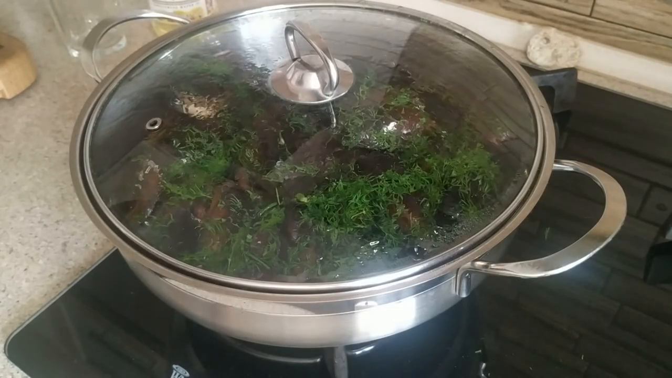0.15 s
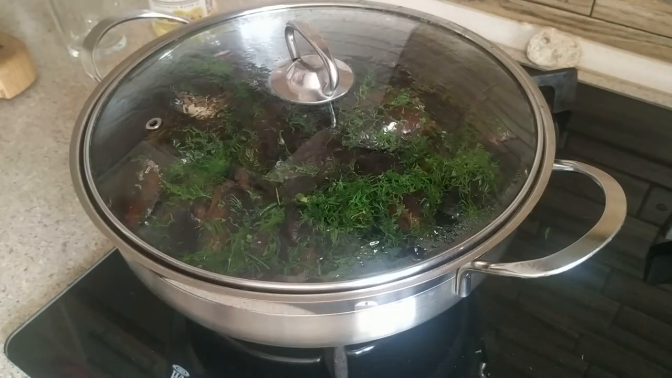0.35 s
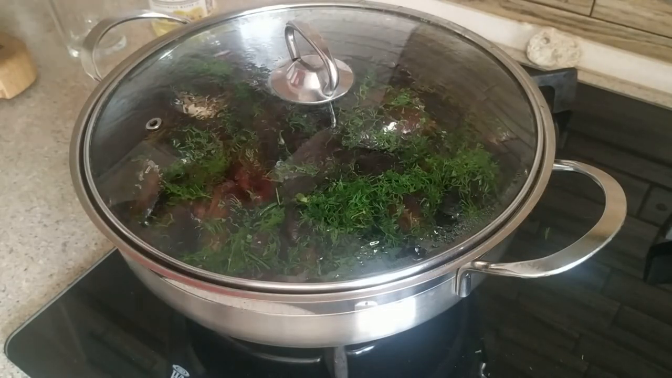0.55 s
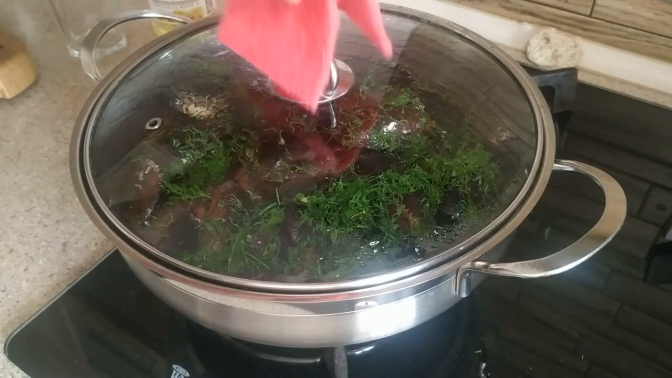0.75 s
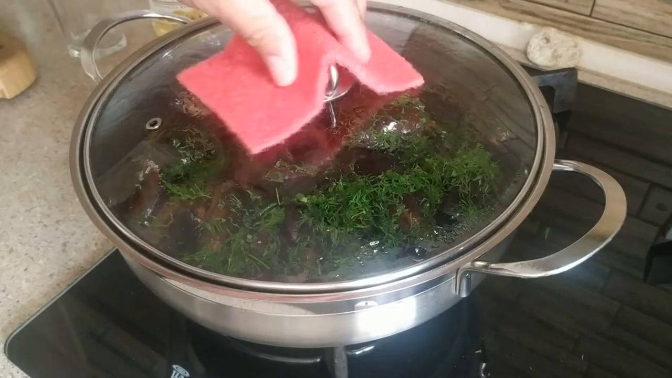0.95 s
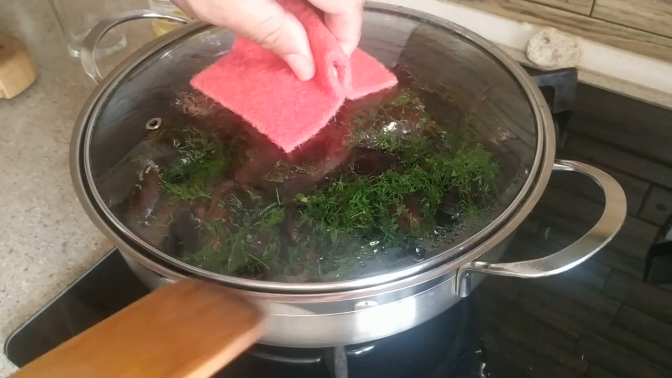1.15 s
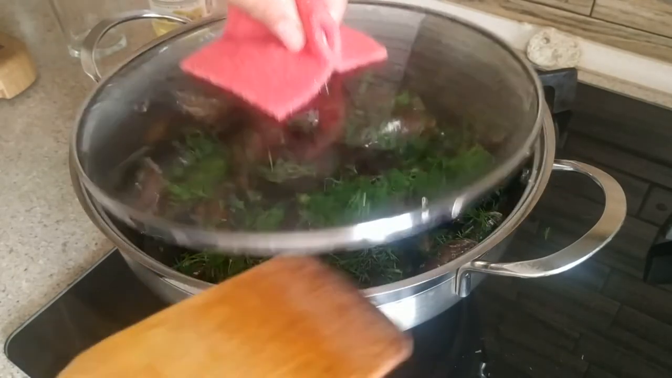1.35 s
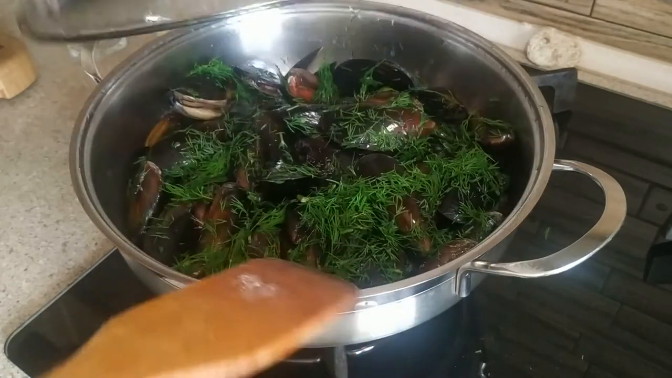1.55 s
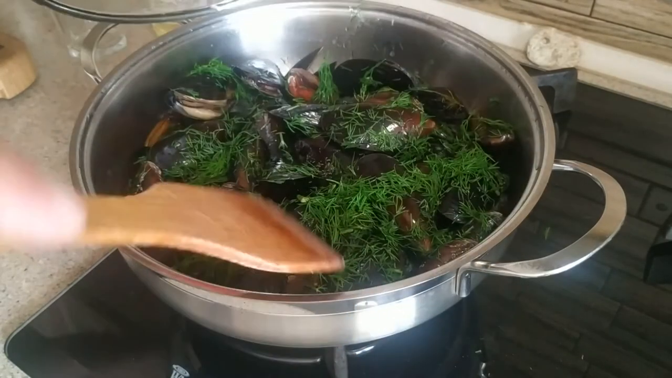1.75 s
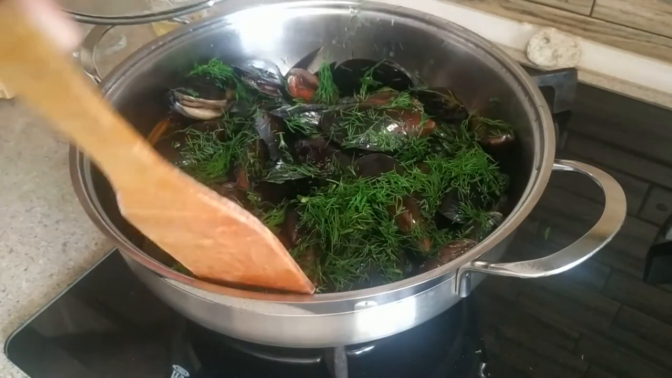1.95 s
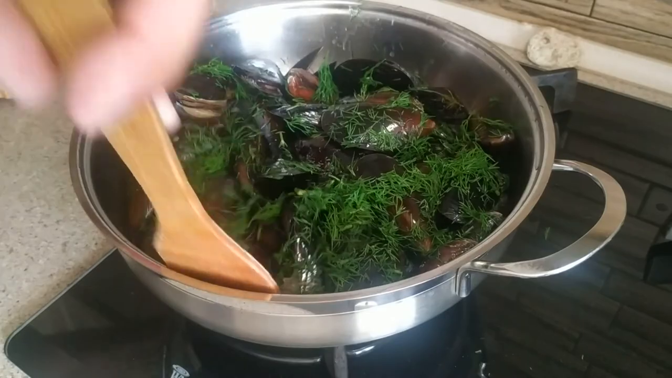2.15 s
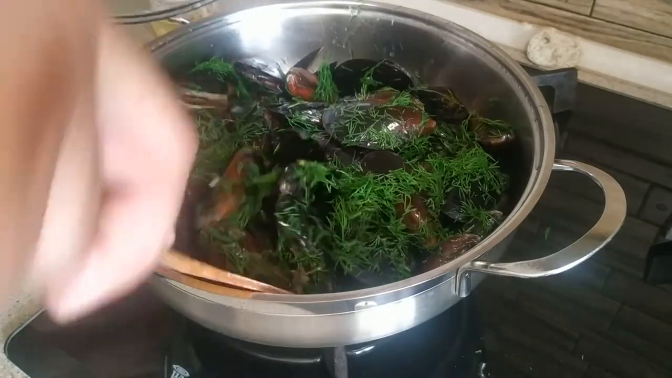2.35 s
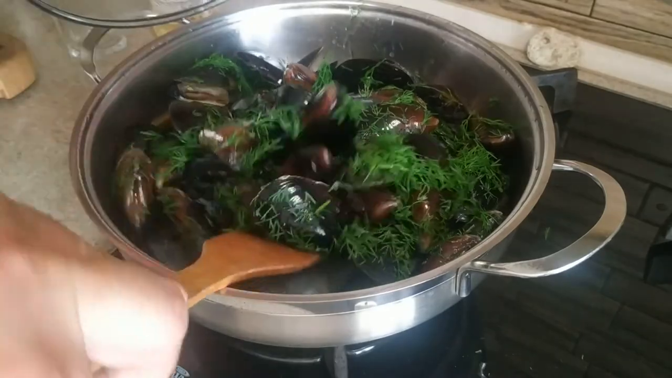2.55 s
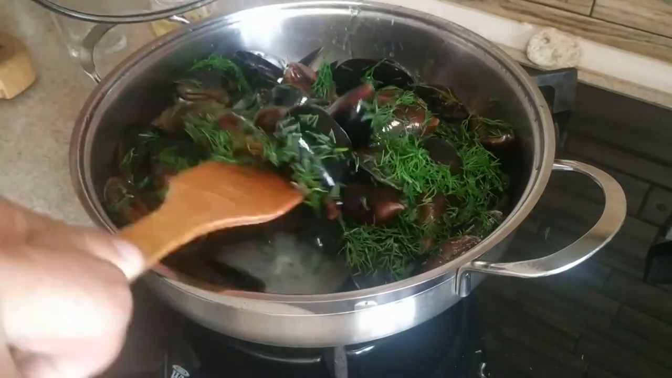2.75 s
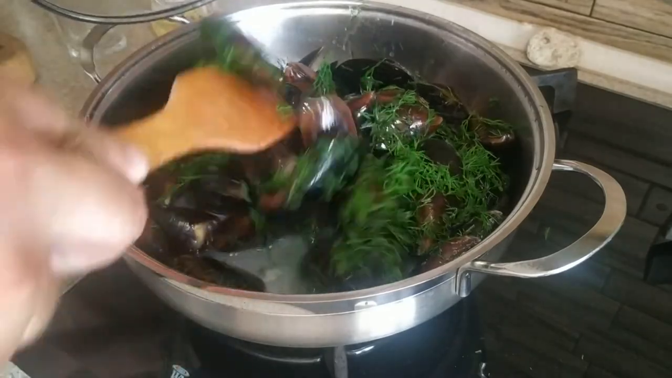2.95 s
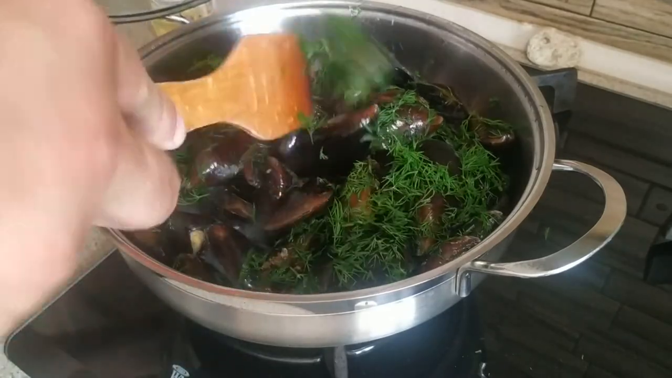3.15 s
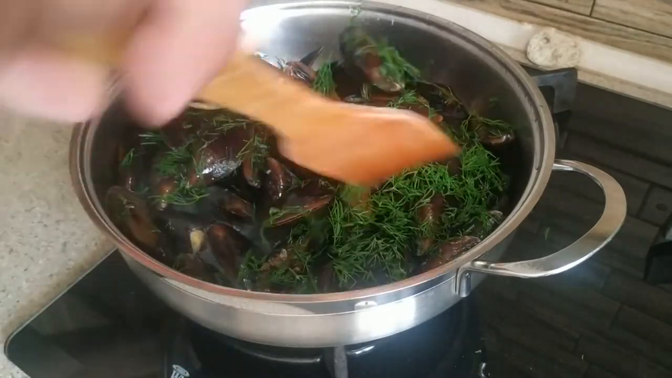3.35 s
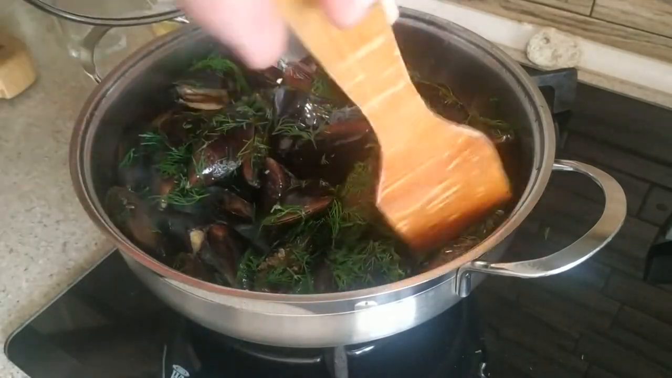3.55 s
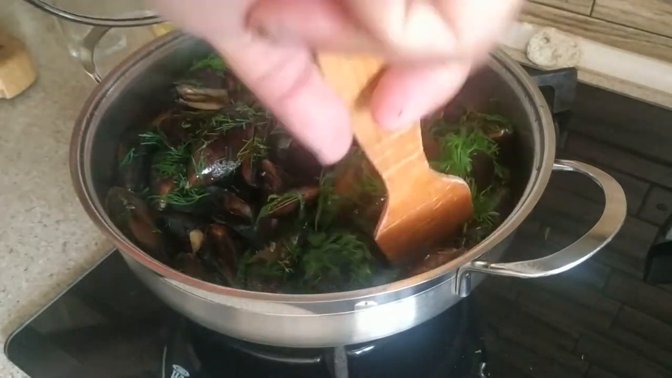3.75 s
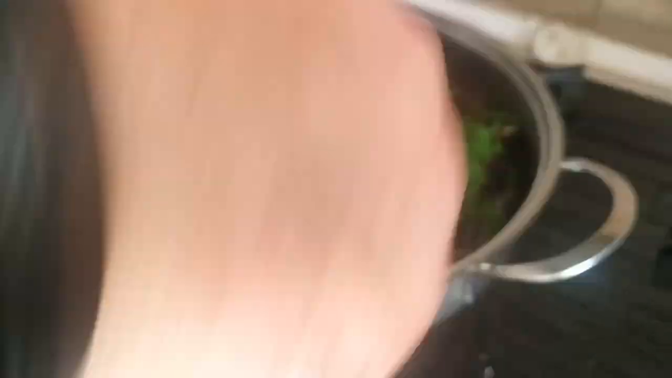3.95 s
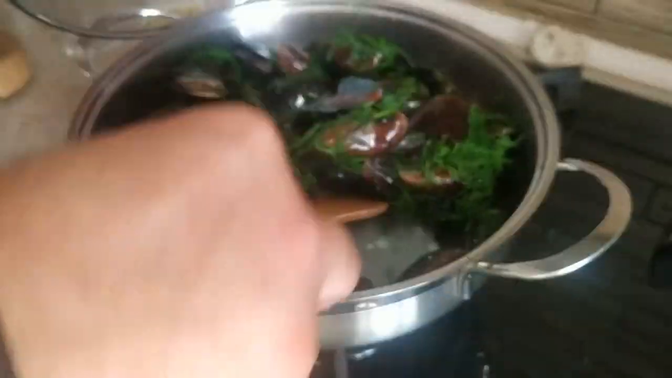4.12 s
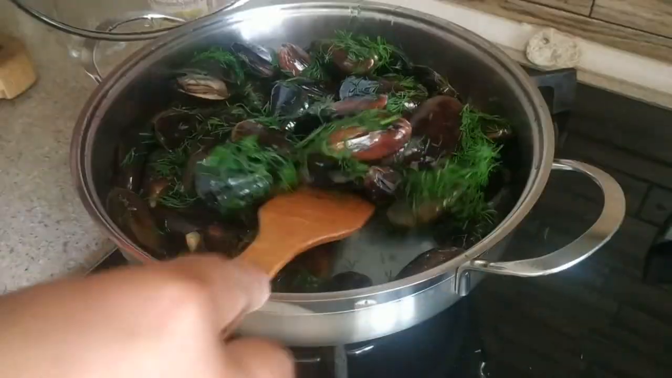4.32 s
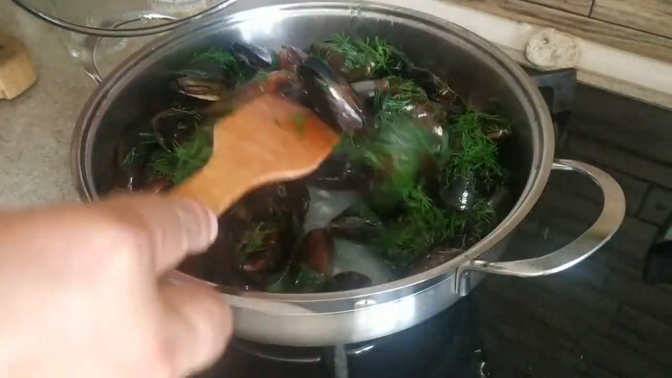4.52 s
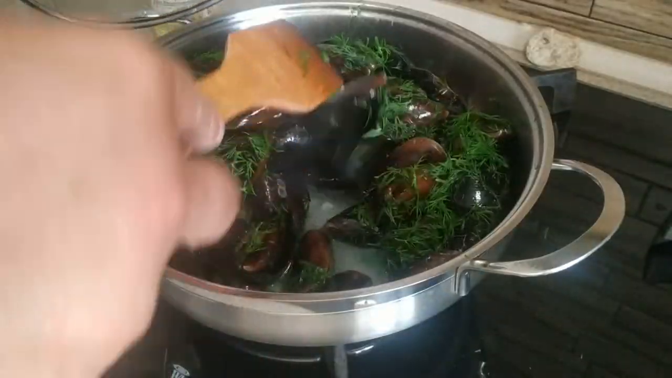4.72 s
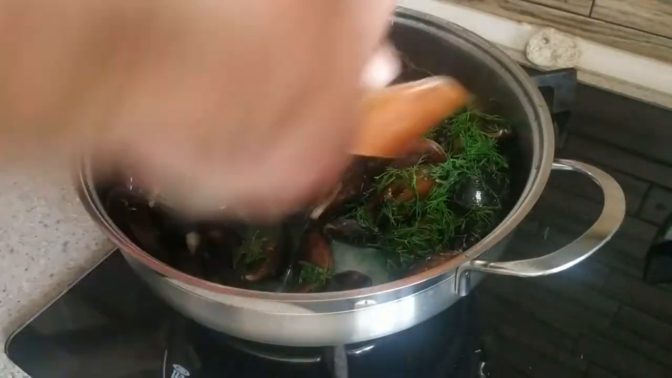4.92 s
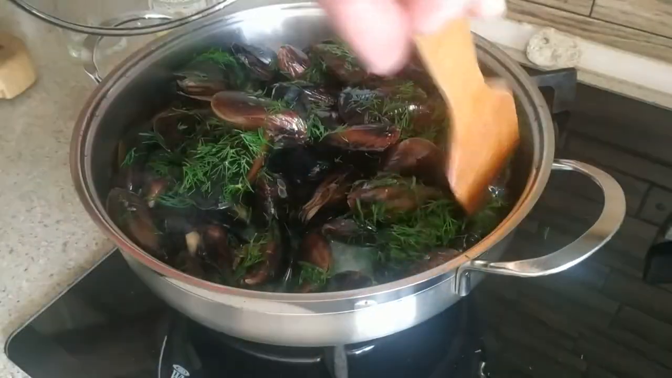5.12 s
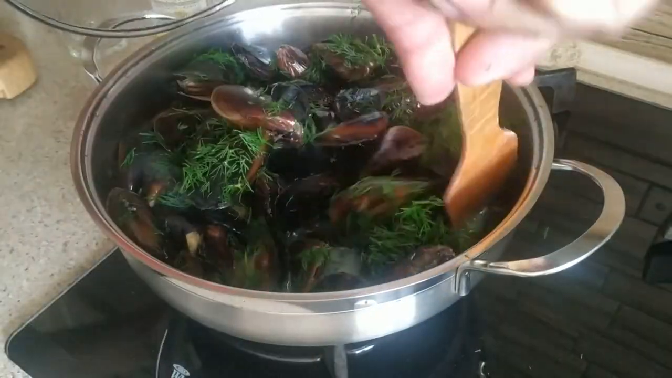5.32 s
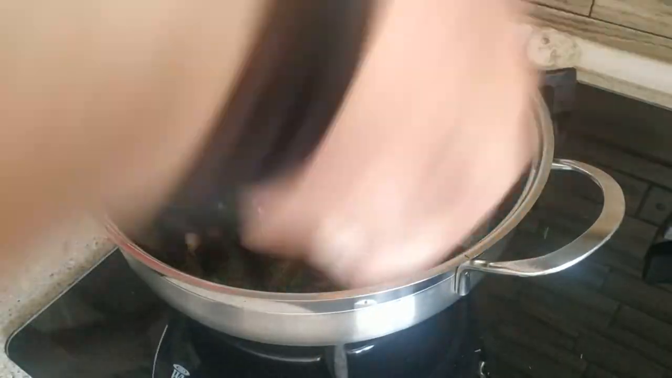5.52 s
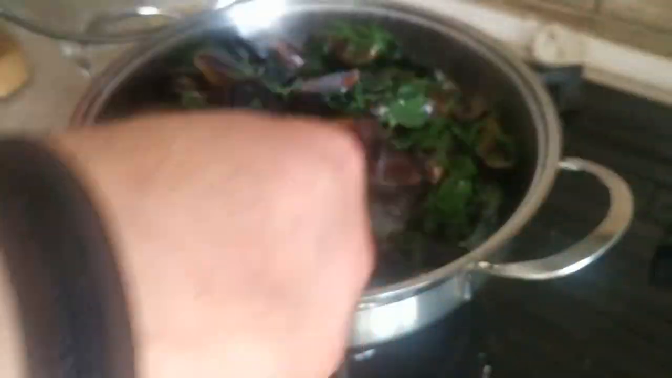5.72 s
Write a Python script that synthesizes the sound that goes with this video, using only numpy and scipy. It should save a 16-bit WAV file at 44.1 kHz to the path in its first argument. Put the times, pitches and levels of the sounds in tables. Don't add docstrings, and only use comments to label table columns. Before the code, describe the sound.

Quiet kitchen hum, then soft cloth rubbing and faint glassy ringing as a hand grips a pan lid. It lifts with a muffled clunk, a low boom and a breathy puff of steam. A wooden spatula then stirs mussels in strokes: hollow knocks, sharp shell clacks and gritty scrapes on steel, with juice hissing. Close stereo microphone, small tiled room with short reflections.

```python
import sys
import numpy as np
from scipy import signal
from scipy.io import wavfile
from scipy.ndimage import uniform_filter1d

SR = 44100
rng = np.random.default_rng(int(sys.argv[2]) if len(sys.argv) > 2 else 0)


def generate_wav(sig):
    pcm = np.round(np.clip(np.atleast_2d(sig).T, -1, 1) * 32767).astype(np.int16)
    wavfile.write(sys.argv[1], SR, pcm)


def decibels_to_gain(level_db):
    exponent = np.asarray(level_db, float) / 20
    return 10 ** exponent


N = 259308

# (frequency [Hz], density [dB per Hz])
KITCHEN_SPECTRUM = [(20, 1.5), (34, -28), (49, -6.5), (158, -12.5), (347, -14), (1090, -21), (1570, -25.5),
                    (16000, -26)]
STEAM_SPECTRUM = [(880, -45), (1500, -3), (1690, -0.5), (1920, -4.5), (3220, 0.5), (4830, 0.5),
                  (16000, -2.5)]
PUFF_SPECTRUM = [(150, -40), (260, -6), (425, -10), (529, -6), (1140, -10.5), (2500, -16), (3250, -31),
                 (5500, -120)]
LID_RUMBLE_SPECTRUM = [(24, -36), (40, -2), (59, -6), (108, 6), (220, -1), (300, -6), (390, -30),
                       (660, -120)]
RATTLE_SPECTRUM = [(150, -20), (250, -22), (450, -5.5), (1000, -2.5), (1800, -3), (2600, -6), (4000, -48),
                   (8000, -68)]
SCRAPE_SPECTRUM = [(1200, -17.5), (2200, -0.5), (3000, 1), (5000, 0), (6500, -5.5), (10000, -9.5)]
HISS_SPECTRUM = [(2500, -12), (5000, -0.5), (6500, -1.5), (9000, 3.5), (13000, 2.5), (15700, -0.5)]
THUD_SPECTRUM = [(20, -23), (45, -17), (68, 3), (84, 3), (96, -27), (160, -21), (260, -13), (400, -24)]
# (frequency [Hz], width [Hz], height [dB])
HUM_HUMPS = [(151, 7.1, 2.5), (1370, 230, 3.5), (4990, 240, 2.5), (10300, 1000, 0.5), (11160, 760, 2)]
GLASS_HUMPS = [(1540, 40, 16), (1850, 50, 25), (2500, 50, 13), (3630, 70, 11), (4780, 80, 13),
               (5200, 140, 9), (5850, 200, 14)]
PAN_HUMPS = [(478.3, 23, 4.5), (625, 37, 6), (1090, 68, 6.5), (1400, 190, 1.5), (1700, 710, -1.5),
             (2420, 90, -86), (3680, 450, 7)]
# (frequency [Hz], correlation [-1..1])
PORT_LIKENESS = [(60, 0.95), (130, 0.96), (290, 0.64), (640, 0.6), (1410, 0.045), (3100, 0), (6820, 0),
                 (15000, 0.083)]
# (frequency [Hz], level [dB], t60 [s])
BOTTOM_MODES = [(232.6, -16.5, 0.091), (387, -24.5, 0.08), (613, -10, 0.032), (1090, -25, 0.22)]
WALL_MODES = [(1700, -11.5, 0.025), (2428, -17.5, 0.039), (3880, -28.5, 0.098)]
# (time [s], rise [s], force [dB], cloth swish [dB], glass ring [dB])
LID_TOUCHES = [
    (0.423, 0.019, -66.5, -59.5, -74),
    (.776, 0.15, -68, -66, -65),
    (.928, .05, -67, -64, -55),
    (1.085, 0.018, -70, -60, -53),
    (1.13, 0.062, -67, -57, -47),
    (1.287, 0.032, -44, -42, -46),
]
# (time [s], peak [dB], shell mode
# [Hz], crack re peak [dB])
DULL_KNOCKS = [(0.424, -41, 452, -5.5), (1.285, -36.5, 540, -4), (1.763, -46, 640, 2),
               (1.919, -37, 466, -26), (1.991, -33, 560, -12), (2.123, -28.5, 1130, -23),
               (2.173, -29, 1350, -21), (2.58, -29.5, 1500, -19), (3.151, -18.5, 1110, -18),
               (3.427, -41, 2610, -15), (3.56, -25.5, 1240, -18.5), (3.667, -28, 504, -14),
               (3.797, -16.5, 1020, -39), (4.776, -22.5, 650, -16), (5.174, -30.5, 624, -20),
               (5.282, -39, 1100, -21), (5.32, -27, 1140, -27), (5.333, -16, 1070, -30),
               (5.341, -11.5, 1130, -28), (5.366, -18, 1020, -19), (5.833, -30.5, 1020, -5)]
# (time [s], peak [dB], shell mode [Hz],
# crack re peak [dB])
TUMBLE_KNOCKS = [(1.299, -50, 530, -3), (2.187, -20.5, 604, -22), (2.426, -28, 1070, -22),
                 (2.4376, -27, 970, -28), (2.794, -21.5, 1200, -18), (2.967, -33, 1070, -9),
                 (2.986, -17, 1090, -25), (3.234, -14.5, 580, -17), (3.692, -21.5, 1100, -12),
                 (3.7104, -18, 1400, -10), (3.992, -27.5, 1790, -20), (4.05, -21, 2010, -34),
                 (4.128, -25.5, 2250, -4), (4.147, -15.5, 1110, -26), (4.193, -15.5, 1250, -37),
                 (4.205, -21.5, 745, -4.5), (4.313, -30, 2100, -28), (4.442, -22, 1000, -22),
                 (4.596, -8.5, 1750, -18), (4.64, -21, 720, -31), (5.22, -15, 1170, -26),
                 (5.459, -14.5, 1010, -6.5), (5.49, -25, 1750, -16), (5.536, -27, 1420, 7.5),
                 (5.555, -16.5, 1780, -17), (5.597, -40, 1700, -13), (5.643, -20, 1460, -13.5)]
# (time [s], peak [dB], shell mode [Hz], crack re peak [dB])
RIM_CLACKS = [(2.2022, -28.5, 1190, -1), (2.32, -35, 1530, -15), (2.858, -29, 1780, -4.5),
              (2.896, -24.5, 1660, -8.5), (2.926, -30, 1240, -29), (3.0455, -23, 1780, -19),
              (3.058, -14, 1870, -18), (3.078, -24, 1399, -7.5), (3.125, -24.5, 1770, -23),
              (3.277, -18, 2150, -26), (3.7188, -16, 1460, -2), (3.737, -18.5, 2890, -22),
              (4.018, -13.5, 1720, -12), (4.078, -20, 2660, -29), (4.33, -56, 468, -3),
              (4.368, -27, 1770, -25), (4.414, -30.5, 1660, -14.5), (4.485, -52, 1500, -3),
              (4.508, -18, 2100, 4), (4.832, -30, 1830, -10), (4.8446, -13.5, 2500, -4),
              (5.109, -31, 1840, -13), (5.25, -25, 1700, -29), (5.403, -23, 1050, -31),
              (5.44, -14.5, 3160, -7), (5.51, -19.5, 2410, -12), (5.6777, -16, 3070, -32),
              (5.727, -19, 1600, -7.5)]
# (time [s], level [dB], t60
# [s])
STEEL_SPURTS = [(.69, -54, 0.51), (1.261, -35, .12), (4.528, -25, .15), (5.439, -17.5, .1),
                (4.126, -29.5, 0.31), (4.331, -27, 0.031), (4.487, -29, 0.034), (5.534, -21.5, 0.16)]
# (time [s], hiss [dB])
BARED_STEEL = [(1.8, -72), (1.91, -69), (2.14, -52.5), (2.48, -39.5), (2.74, -35.5), (2.97, -49),
               (3.02, -41.5), (3.36, -44), (3.62, -49), (3.73, -47), (3.87, -48), (4.08, -49),
               (4.17, -35.5), (4.33, -38), (4.54, -38), (4.85, -39), (5.0, -42.5), (5.88, -46.5)]
# (time [s], frequency [Hz], peak [dB], t60 [s])
FREE_RINGS = [
    (.925, 665, -52, 0.29),
    (1.311, 535, -51, 0.65),
    (1.31, 480, -54, .9),
    (3.43, 2710, -42.5, 0.2),
    (4.846, 2430, -26, 0.15),
    (4.602, 2430, -29, .14),
]
# (time [s], peak [dB], frequency [Hz], t60 [s])
BOTTOM_BOOMS = [(1.276, -33, 142, 0.11), (1.917, -48.5, 314, 0.14), (2.14, -48.5, 172, 0.15),
                (2.182, -41, 434, 0.18), (2.281, -44, 152, 0.17), (2.547, -43, 232, 0.16),
                (2.67, -54, 388, 0.15), (2.986, -41, 427, 0.15), (3.04, -44, 358, 0.14),
                (3.151, -25.5, 381, 0.064), (3.432, -49, 221, 0.23), (3.555, -40, 228, 0.11),
                (3.682, -30.5, 215, 0.076), (3.799, -34.5, 157, 0.12), (4.007, -41.5, 145, 0.15),
                (4.067, -41, 219, 0.14), (4.439, -44, 236, 0.094), (4.528, -43, 221, 0.12),
                (4.547, -39, 230, 0.18), (5.055, -50, 392, 0.15), (5.194, -34, 230, 0.078),
                (5.338, -28.5, 393, 0.074), (5.46, -45, 368, 0.15), (5.636, -47, 360, 0.15)]
# (time [s], peak [dB], frequency [Hz], t60 [s])
SHELL_CLONKS = [(2.128, -23, 1130, 0.027), (2.14, -35, 1140, 0.03), (2.153, -33, 1470, 0.028),
                (2.196, -20, 1550, 0.036), (2.215, -23, 1145, 0.033), (2.235, -29, 1420, 0.03),
                (2.292, -38, 1500, 0.03), (2.348, -45, 999, 0.03), (2.53, -24, 1360, 0.041),
                (2.546, -23.5, 1090, 0.032), (2.59, -29, 1450, 0.03), (2.609, -32, 525, 0.042),
                (2.774, -24, 1165, 0.048), (2.823, -24, 1850, 0.03), (2.871, -25, 1540, 0.03),
                (3, -20, 1080, 0.034), (3.109, -26, 1740, 0.03), (3.165, -24, 1820, 0.03),
                (3.221, -25, 670, 0.051), (3.247, -20, 1060, 0.021), (3.575, -29, 1090, 0.032),
                (3.758, -31, 1140, 0.024), (3.776, -24, 1130, 0.024), (3.817, -23.5, 1000, 0.041),
                (4.01, -17, 1770, 0.032), (4.051, -17, 1800, 0.033), (4.135, -19.5, 1150, 0.043),
                (4.164, -20, 2130, 0.03), (4.489, -20, 2220, 0.02), (4.533, -35, 650, 0.026),
                (4.547, -24, 635, 0.048), (4.561, -21.5, 720, 0.034), (4.609, -21, 2470, 0.03),
                (4.674, -27.5, 2410, 0.036), (4.785, -26, 1090, 0.03), (4.874, -18, 2340, 0.033),
                (5.22, -19, 1170, 0.027), (5.304, -35, 1160, 0.023), (5.479, -22, 1035, 0.033),
                (5.524, -21, 733, 0.043), (5.574, -26, 1020, 0.03), (5.614, -40, 557, 0.03),
                (5.865, -29, 1120, 0.03)]
EDGE_TICKS = [(2.2024, -16, 3530, 0.021), (2.2574, -26, 3300, 0.016), (2.3994, -33, 2930, 0.015),
              (2.5474, -26, 4400, 0.015), (2.6605, -19.5, 7700, 0.015), (2.745, -23, 4530, 0.015),
              (2.8044, -22, 7060, 0.018), (3.08, -14, 2890, 0.02), (3.235, -16, 4500, 0.014),
              (3.744, -30, 2530, 0.015), (3.8187, -22.5, 2930, 0.018), (3.8394, -26, 5500, 0.019),
              (3.9204, -32, 3690, 0.015), (3.9913, -16.5, 3930, 0.015), (4.0183, -1.5, 4160, 0.017),
              (4.1759, -15, 5900, 0.015), (4.2048, -5.5, 4140, 0.018), (4.4513, -14, 2600, 0.03),
              (4.5084, -5.5, 5860, 0.016), (4.5356, -12, 8770, 0.019), (4.5574, -15.5, 4950, 0.017),
              (4.5958, -4, 2470, 0.017), (4.8459, -6.5, 2410, 0.014), (5.4028, -22, 4240, 0.017),
              (5.442, -7, 5750, 0.016), (5.465, -5.5, 5680, 0.025), (5.5404, -11.5, 3680, 0.035),
              (5.6514, -15, 2630, 0.017), (5.7266, -7, 2900, 0.02)]
# (time [s], hold [s], shells moved [dB], drag re shells [dB], weight on stove [dB])
SPATULA_PUSHES = [(2.162, 0.3, -45.5, -5, -43.5), (2.54, 0.037, -40.5, -2, -45.5),
                  (2.758, 0.14, -42.5, -3, -54), (2.985, 0.31, -46, -2.5, -48), (3.365, 0.11, -56, -2, -66),
                  (3.579, 0.011, -52, -15, -41.5), (3.742, 0.032, -35, -11, -30.5),
                  (3.903, 0.08, -61, -8, -51), (4.042, 0.14, -39, -1.5, -41.5),
                  (4.358, 0.14, -48, -2.5, -55), (4.545, 0.039, -37.5, -4.5, -41.5),
                  (4.677, 0.078, -50.5, -5, -52.5), (4.86, 0.014, -43.5, 0.5, -55),
                  (5.066, 0.011, -49.5, -7, -52.5), (5.224, 0.0095, -40, -5, -40.5),
                  (5.342, 0.013, -37.5, -7.5, -37), (5.486, .12, -34, -0.5, -42.5),
                  (5.72, 0.17, -49, -0.5, -52.5)]


def evened(x):
    return x / np.sqrt(np.mean(x ** 2) + 1e-20)


def read(points, hz):
    f, value = np.transpose(points)
    return np.interp(np.log(hz + 1), np.log(f + 1), value)


def bumps(peaks, hz):
    return sum(decibels_to_gain(db) / (1 + (2 * (hz - f) / width) ** 2) for f, width, db in peaks)


def spectrum_gain(points, peaks, hz):
    return decibels_to_gain(read(points, hz)) * (1 + bumps(peaks, hz))


def band(x, lo_hz, hi_hz, order=2):
    return signal.lfilter(*signal.butter(order, [lo_hz, hi_hz], "bandpass", fs=SR), x)


def noise(points, peaks=(), patchy_db=4.5, size=512):
    frames = 4 * N // size + 5
    hz = np.fft.rfftfreq(size, 1 / SR)
    a, b, c, d, patches = rng.standard_normal((frames, len(hz), 5)).T
    patches = uniform_filter1d(patches, size // 80, 0)
    patches = evened(uniform_filter1d(patches, 8192 // size, 1))
    same = np.clip(read(PORT_LIKENESS, hz), -1, 1)[:, None]
    left = a + 1j * b
    right = same * left + np.sqrt(1 - same ** 2) * (c + 1j * d)
    z = np.array([left, right])
    z *= spectrum_gain(points, peaks, hz)[:, None] * decibels_to_gain(patchy_db * patches)
    return evened(signal.istft(z, nperseg=size, noverlap=3 * size // 4)[1][:, :N])


def streaky(x, power):
    _, _, z = signal.stft(x, SR, nperseg=1024, noverlap=768)
    steady = uniform_filter1d(abs(z) ** 2, size=7, axis=2) + 1e-16
    contrast = steady / uniform_filter1d(steady, size=25, axis=1)
    z *= np.clip(contrast ** power, .03, 2.5)
    return evened(signal.istft(z, SR, nperseg=1024, noverlap=768)[1][:, :N])


def colour(x, points, peaks=()):
    hz = abs(np.fft.fftfreq(8192, 1 / SR))
    log_gain = np.log(spectrum_gain(points, peaks, hz))
    taps = np.fft.ifft(np.exp(np.conj(signal.hilbert(log_gain)))).real[:4096]
    return signal.oaconvolve(x, taps[None], axes=1)[:, :N]


def swells(start_s, hold_s, db, rise_s, fall_s):
    t = np.arange(0, N + 64, 64)[:, None] / SR
    before = np.maximum(start_s - t, 0) / rise_s
    after = np.maximum(t - start_s - hold_s, 0) / fall_s
    power = (decibels_to_gain(db - 20 * (before + after)) ** 2).sum(axis=1)
    return np.interp(np.arange(N), t[:, 0] * SR, np.sqrt(power))


def grains(per_s, spread_db, lo_hz, hi_hz, cycles, count=16):
    size = decibels_to_gain(spread_db * np.minimum(rng.exponential(1, N), 4)) * (rng.random(N) < per_s / SR)
    shell = rng.integers(0, count, N)
    out, t = np.zeros((2, N)), np.arange(1024) / SR
    for k, (pitch, slack, place) in enumerate(rng.random((count, 3))):
        hz = lo_hz * (hi_hz / lo_hz) ** ((k + pitch) / count)
        tap = np.sin(2 * np.pi * hz * t) * np.exp(-t * hz / (cycles * (.5 + slack)))
        ring = signal.oaconvolve(size * (shell == k), tap / np.linalg.norm(tap))[:N]
        out += [ring, np.roll(ring, int(24 * place) - 8)]
    out /= uniform_filter1d((out ** 2).mean(0), 6000) ** 0.47 + 1e-9
    return evened(out)


def kitchen():
    hum = noise(KITCHEN_SPECTRUM, HUM_HUMPS, patchy_db=0.5, size=2048)
    return decibels_to_gain(-53.5) * streaky(hum, 0.5)


def lid():
    let_go_s = .17
    open_s, steaming_s, steam_rise_s = 1.632, 0.27, 0.45
    steam_db, draught_db, suction_db = -59.5, -60.5, 2
    s, rise_s, force_db, swish_db, ring_db = np.transpose(LID_TOUCHES)
    ring = swells(s, 0, ring_db, rise_s, let_go_s)
    force = swells(s, 0, force_db, rise_s, let_go_s)
    swish = swells(s, 0, swish_db, rise_s, let_go_s)
    rising = swells(open_s, steaming_s, 0, steam_rise_s, let_go_s)
    rising *= np.arange(N) > s[-1] * SR
    hiss = np.hypot(swish, decibels_to_gain(steam_db) * rising)
    puff = np.hypot(decibels_to_gain(suction_db) * force, decibels_to_gain(draught_db) * rising)
    rub_spectrum = [(300, -12), (1500, 1.0), (5000, 16.5), (6500, -4), (9000, -27)]
    glass = noise(rub_spectrum, GLASS_HUMPS, patchy_db=2.3, size=2048)
    steam = streaky(noise(STEAM_SPECTRUM, patchy_db=1.7), 0.62)
    air = noise(PUFF_SPECTRUM, [(1020, 56, 1.9), (539, 54, 2.5)], patchy_db=3.5, size=1024)
    stove = noise(LID_RUMBLE_SPECTRUM, patchy_db=-1.5, size=2048)
    return decibels_to_gain(3.0) * ring * glass + decibels_to_gain(9.5) * hiss * steam + decibels_to_gain(3.5) * puff * air + decibels_to_gain(5.5) * force * stove


def burst(lo_hz, hi_hz, t60_s, modes, lag):
    t = np.arange(2600) / SR
    fast, slow = decibels_to_gain(-11 - 60 * t / t60_s), decibels_to_gain(-26 - 60 * t / .06)
    spray = rng.standard_normal((2, len(t))) * (fast + slow)
    spray[:, 0] = -2.2
    spray = band(spray, lo_hz, hi_hz, order=3)
    spray /= abs(spray).max()
    spray -= sum(decibels_to_gain(db - 60 * t / ring_s) * np.sin(2 * np.pi * hz * t) for hz, db, ring_s in modes)
    spray *= signal.windows.tukey(2 * len(t), .3)[len(t):]
    spray[0] = np.r_[np.zeros(lag), spray[0]][:len(t)]
    return spray / abs(spray.mean(0)).max()


def knock(db, shell_hz, crack_db, blow_db, clack_db, place):
    shell = [(shell_hz, -1.5, .022), (1.31 * shell_hz, -10, .012)]
    lag = int(7 * place)
    low = shell_hz < 1400
    blow = burst(450, 1400, .013, BOTTOM_MODES + shell * low, lag)
    clack = burst(1400, 4400, .009, WALL_MODES + shell * (not low), lag)
    crack = burst(3600, 7500, .008, [], lag) + decibels_to_gain(-1) * burst(7500, 15500, .012, [], lag)
    return decibels_to_gain(db) * (decibels_to_gain(blow_db + 8) * blow + decibels_to_gain(clack_db + 9.0) * clack + decibels_to_gain(crack_db + 11) * crack)


def knocks():
    out = np.zeros((2, N + 4000))
    # (events, blow [dB], clack [dB])
    kinds = (DULL_KNOCKS, -6, -21), (TUMBLE_KNOCKS, -10.5, -10), (RIM_CLACKS, -19, -4)
    for table, blow_db, clack_db in kinds:
        for s, db, shell_hz, crack_db in table:
            sound = knock(db, shell_hz, crack_db, blow_db, clack_db, rng.random())
            out[:, round((s + .0014) * SR):][:, :2600] += sound
    return band(out[:, :N], 380, 20000)


def juice():
    t = np.arange(N) / SR
    hiss = decibels_to_gain(np.interp(t, *np.transpose(BARED_STEEL)))
    hiss *= np.clip((t - BARED_STEEL[0][0]) / 0.045, 0, 1)
    spurts = sum((t > s) * decibels_to_gain(db - 60 * np.maximum(t - s, 0) / t60) for s, db, t60 in STEEL_SPURTS)
    fizz = evened(colour(grains(2000, 4.4, 5000, 15000, 1., count=10), HISS_SPECTRUM))
    wet = .45 * fizz + .9 * streaky(noise(HISS_SPECTRUM, patchy_db=1.7), 1.5)
    return (decibels_to_gain(4.5) * hiss + spurts) * wet


def rings():
    out = np.zeros(N + SR)
    booms = [(s, hz, db, t60) for s, db, hz, t60 in BOTTOM_BOOMS]
    for s, hz, db, t60 in FREE_RINGS + booms:
        age = np.arange(round(min(t60, 1) * SR)) / SR
        beat = 1 + 0.12 * np.cos(2 * np.pi * 0.0276 * hz * age)
        envelope = decibels_to_gain(db - 60 * age / t60) * (1 - np.exp(-age / 0.0052))
        out[round(s * SR):][:len(age)] += envelope * beat * np.sin(2 * np.pi * hz * age)
    return out[:N]


def nudges():
    rows = SHELL_CLONKS + EDGE_TICKS
    out, t = np.zeros((2, N + 2048)), np.arange(2000) / SR
    for (s, db, hz, t60), (a, b, place) in zip(rows, rng.random((len(rows), 3))):
        modes = (1, 1), (.78 + .12 * a, .5), (1.115 + 0.19 * b, .6)
        cluster = sum(gain * np.sin(2 * np.pi * hz * ratio * t) for ratio, gain in modes)
        sound = decibels_to_gain(db - 5.5 - 60 * t / t60) * (1 - np.exp(-t / 0.00047)) * cluster
        at = round((s + 0.001027) * SR)
        out[0, at + int(8 * place):][:len(t)] += sound
        out[1, at:][:len(t)] += sound
    return out[:, :N]


def spatula():
    rise_s, settle_s, drag_fade_s, stove_fade_s = .11, 0.16, 0.17, 0.17
    start_s, hold_s, moved_db, drag_db, weight_db = np.transpose(SPATULA_PUSHES)
    rattle = swells(start_s, hold_s, moved_db, rise_s, settle_s)
    scrape = swells(start_s, hold_s, moved_db + drag_db, rise_s, drag_fade_s)
    thud = swells(start_s, hold_s, weight_db, rise_s, stove_fade_s)
    clatter = evened(colour(grains(1000, 3.4, 350, 3000, 1.8), RATTLE_SPECTRUM, PAN_HUMPS))
    grit = evened(colour(grains(1400, 3.8, 2200, 7000, 1.6, count=10), SCRAPE_SPECTRUM))
    shells = 0.72 * clatter + 0.6 * noise(RATTLE_SPECTRUM, PAN_HUMPS, patchy_db=3.0)
    steel = .55 * grit + .85 * streaky(noise(SCRAPE_SPECTRUM, patchy_db=2.), 1.4)
    stove = noise(THUD_SPECTRUM, [(81, 15, -0.5)], patchy_db=-3.0, size=2048)
    return decibels_to_gain(4.5) * rattle * shells + decibels_to_gain(6.5) * scrape * steel + decibels_to_gain(-2.0) * thud * stove


def echoes(start_s, t60_s, length_s):
    taps = np.zeros((2, round(length_s * SR)))
    at = np.arange(round(start_s * SR), taps.shape[1] - 12, 12)
    at = at + rng.integers(0, 12, (2, len(at)))
    np.put_along_axis(taps, at, rng.choice([-1., 1.], at.shape), 1)
    taps *= decibels_to_gain(-60 * np.arange(taps.shape[1]) / SR / t60_s)
    return taps / np.linalg.norm(taps, axis=1, keepdims=True)


def scene():
    hits = knocks() + nudges()
    scattered = band(hits, 600, 14700)
    bowl = signal.oaconvolve(scattered, echoes(.0015, .045, .08), axes=1)[:, :N]
    room = signal.oaconvolve(scattered, echoes(.008, 0.17, .4), axes=1)[:, :N]
    struck = hits + decibels_to_gain(-14) * bowl + decibels_to_gain(-13) * room
    return kitchen() + lid() + struck + juice() + rings() + spatula()


def dropouts(x):
    hz, t, z = signal.stft(x, SR, nperseg=1024, noverlap=768)
    field = rng.standard_normal((len(t), len(hz))).T
    field = evened(uniform_filter1d(uniform_filter1d(field, size=7, axis=0), size=14, axis=1))
    gate = np.clip((field + 1.05) / .2, .02, 1)
    power = (abs(z) ** 2).sum(axis=(0, 1))
    knocked = np.clip(power / uniform_filter1d(power, size=21) - 1.2, 0, 1)
    gate = np.maximum(gate, knocked)
    z *= np.where(hz[:, None] > 2900, gate, 1)
    return signal.istft(z, SR, nperseg=1024, noverlap=768)[1][:, :N]


def top_cut(x):
    return signal.sosfilt(signal.butter(12, 16970, fs=SR, output="sos"), x)


def record(dry):
    ceiling, edge_hz = .9, 15900
    gated = dropouts(ceiling * np.tanh(dry / ceiling))
    lowpass = signal.firwin(511, edge_hz, window=("kaiser", 5), fs=SR)
    mix = signal.oaconvolve(gated, lowpass[None], "same")
    return top_cut(mix)


dry = scene()
out = record(dry)
generate_wav(out)
```